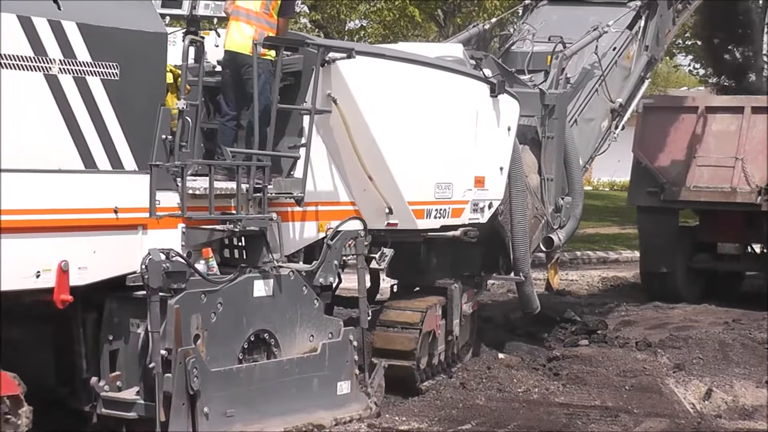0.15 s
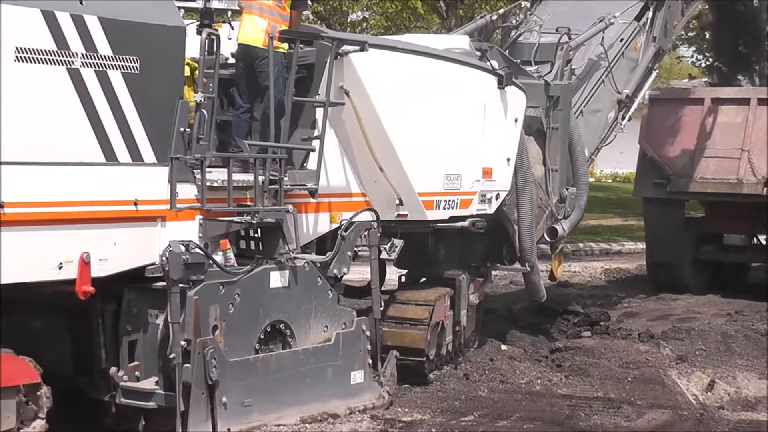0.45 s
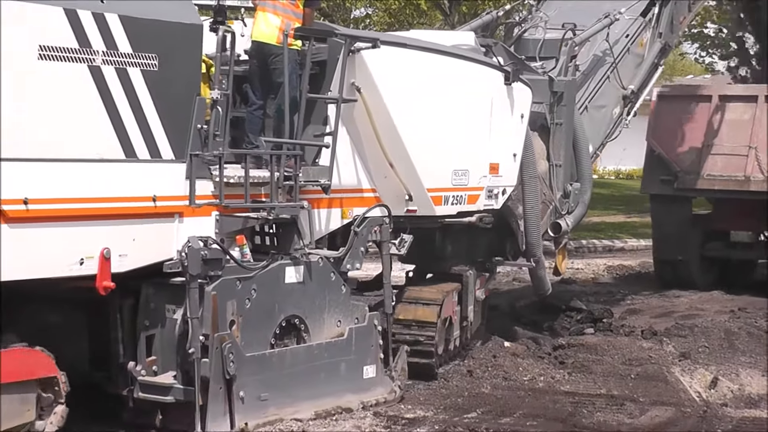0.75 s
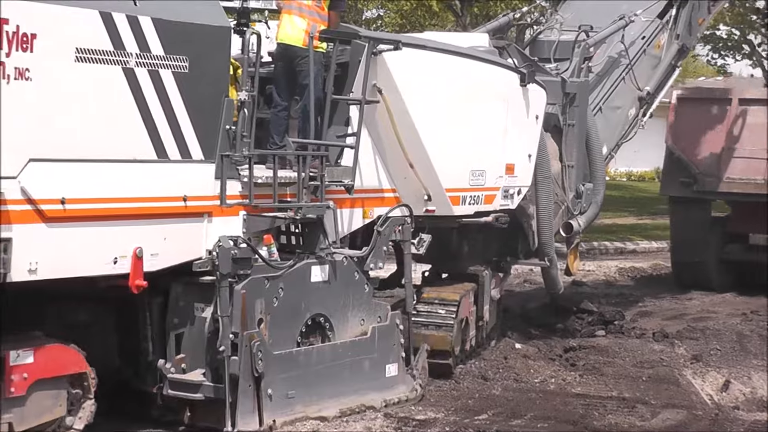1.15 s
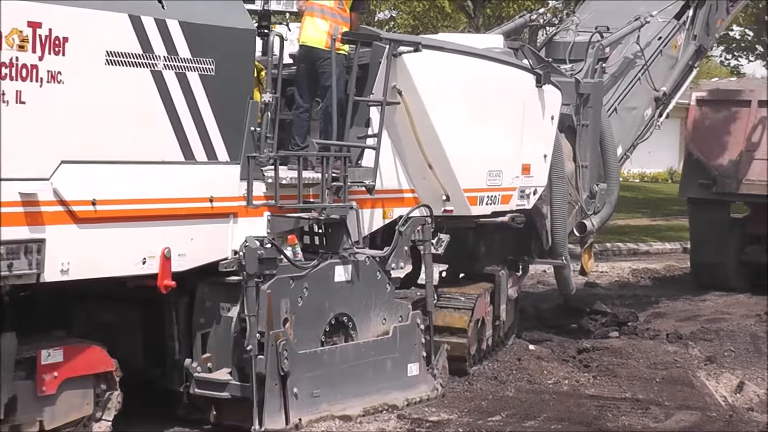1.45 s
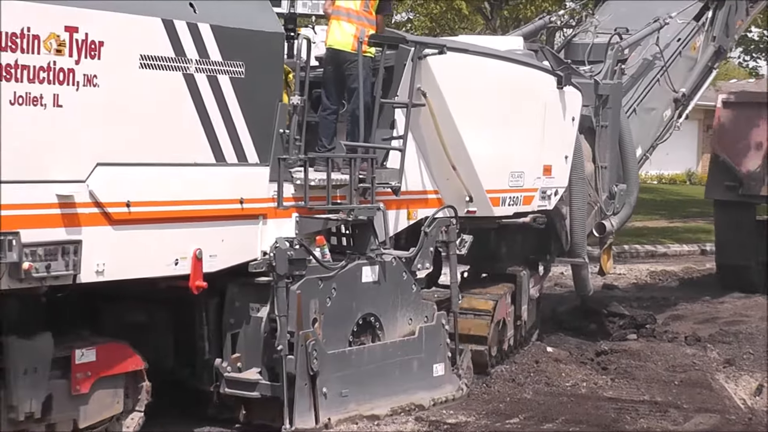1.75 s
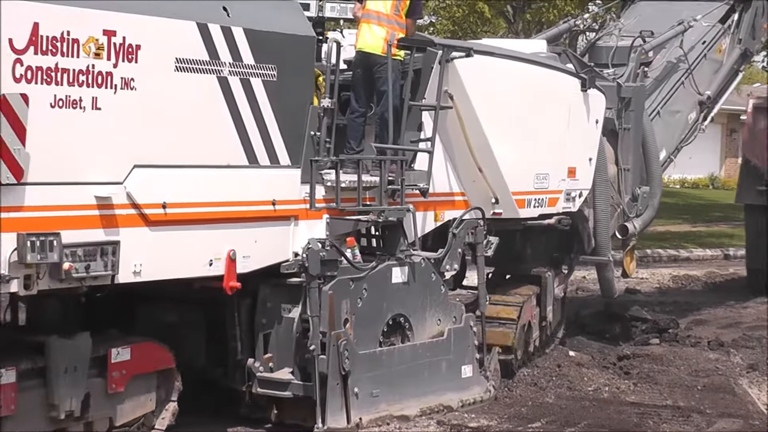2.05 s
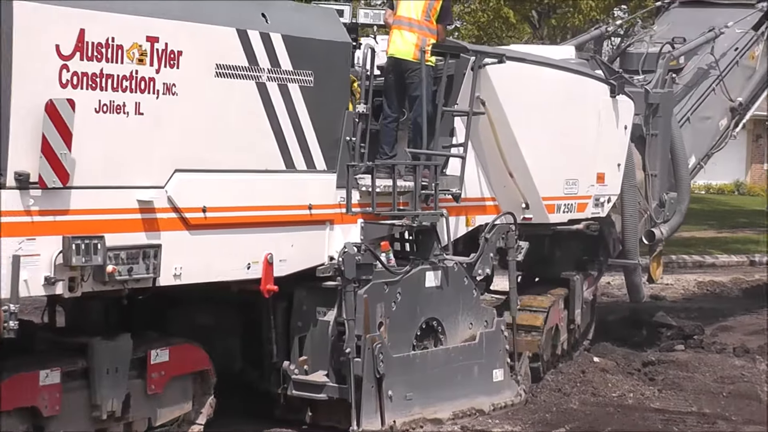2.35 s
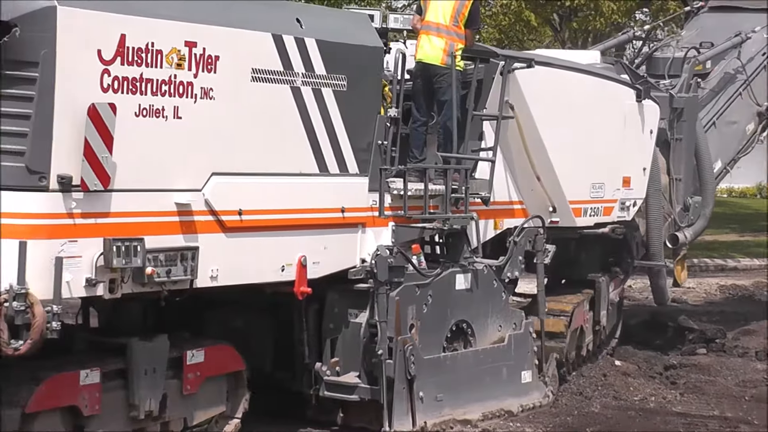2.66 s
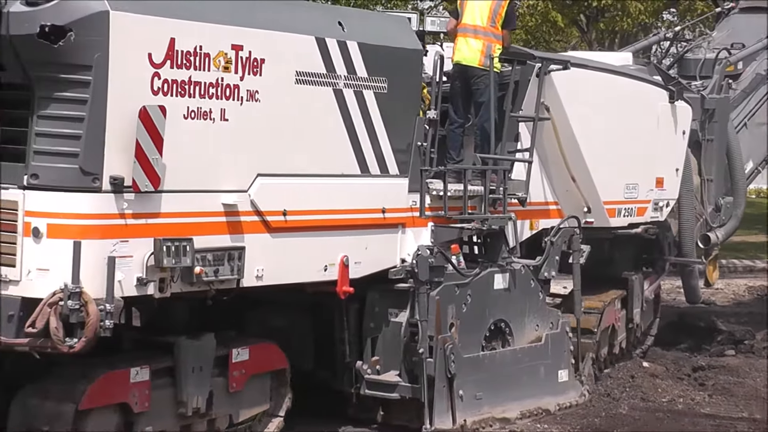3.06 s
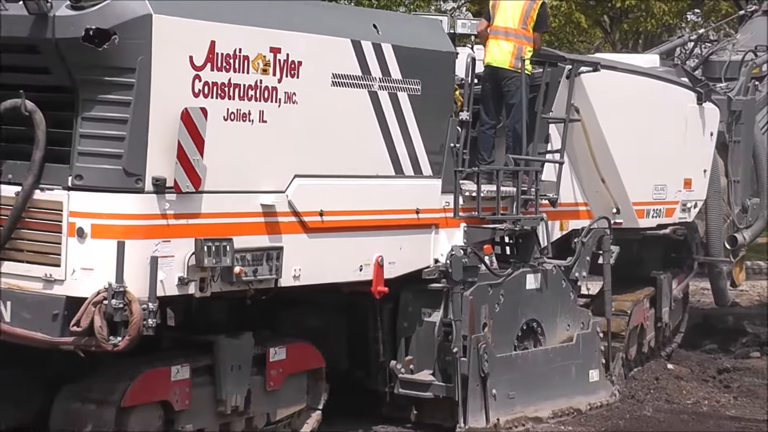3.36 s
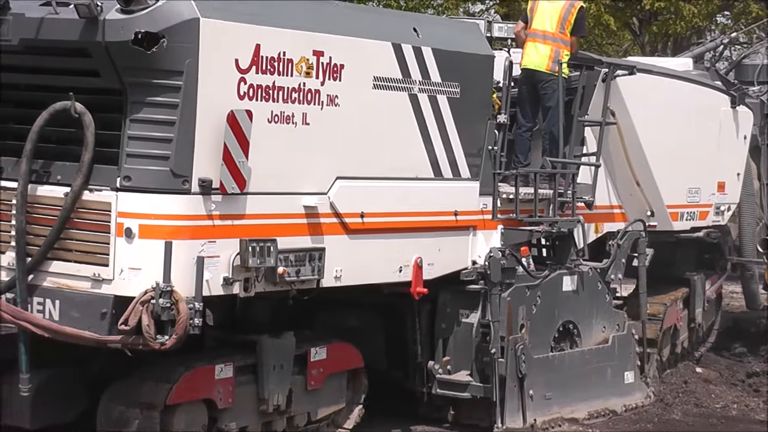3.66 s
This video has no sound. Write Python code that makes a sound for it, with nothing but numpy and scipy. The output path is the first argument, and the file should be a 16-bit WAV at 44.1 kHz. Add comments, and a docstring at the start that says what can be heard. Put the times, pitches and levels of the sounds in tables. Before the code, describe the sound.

Close outdoor stereo of a heavy milling machine: steady diesel and hydraulic roar with faint whine, constant piercing track squeaks and gritty crunches, brief metal scrapes, a small chink, then a dull knock and settling thuds.

```python
"""Work site, a stereo microphone close to a large road milling machine crawling on its tracks.
From the start: a roar of shaped noise, wavering sines for engine orders and pump whines, and fine grit.
Track pins squeal, pieced together from gliding sines, and track pads crunch in bursts of grains, to the end.
From 1.4 s four scrapes ring a link; at 2.5 s a loose part chinks twice. Near 3.4 s the roar drops and
a heavy knock rings low modes; at 3.7 s a heavy part settles with two thuds."""
import sys
import numpy as np
from scipy import signal
from scipy.fft import rfft, irfft
from scipy.io import wavfile

SR = 44100
rng = np.random.default_rng(int(sys.argv[2]) if len(sys.argv) > 2 else 0)


def waveform_to_disk(signal):
    """Save audio, clipped to [-1, 1], as 16-bit WAV at the path in sys.argv[1]."""
    frames = np.transpose(np.atleast_2d(signal))
    scaled = np.clip(frames, -1, 1) * 32767
    samples = np.round(scaled).astype(np.int16)
    wavfile.write(sys.argv[1], SR, samples)


N = 167139

# All levels are those ahead of record(), which lifts quiet sound by 0.9 dB.
# Roar of diesel, fans and hydraulics over time; only the swing about each column's mean is used:
# [start_s, middle_db, bass_db, upper_db, treble_db]
ROAR_SWING = [(0, -19.5, -15, -19, -38), (.31, -18.5, -17.5, -20, -37), (.61, -18.5, -16.5, -19.5, -36.5),
              (.8, -18, -15.5, -20.5, -37.5), (1.0, -17, -16, -19, -36), (1.2, -17, -13.5, -17, -36),
              (1.37, -15.5, -12.5, -18, -34.5), (1.5, -18.5, -15.5, -18.5, -34.5),
              (1.8, -17, -16, -18.5, -36), (1.95, -15.5, -15, -18.5, -33), (2.1, -18, -14.5, -20.5, -39),
              (2.3, -19, -18.5, -21, -36.5), (2.5, -19, -20.5, -21.5, -38.5),
              (2.72, -18.5, -14.5, -18, -34.5), (2.9, -18, -19, -20, -37.5), (3.15, -18, -15.5, -19, -34.5),
              (3.39, -18.5, -14, -19, -32.5), (3.415, -21, -19, -21.5, -32),
              (3.47, -21.5, -24, -25.5, -39.5), (3.68, -22, -25, -24.5, -37),
              (3.74, -20.5, -17, -18.5, -32.5), (3.79, -20.5, -19, -24, -39)]
# Spectrum of the roar, relative: [frequency_hz, density_db_per_hz]
ROAR_COLOUR = [(15, -59), (25, -38), (55, -21), (104, -2.5), (140, 2), (190, 0), (260, -2), (340, -5),
               (469, -2.5), (700, -4), (848, -10.5), (1080, -9.5), (1270, -12.5), (1850, -14.5),
               (2740, -19), (2980, -21.5), (3890, -24), (5240, -22.5), (6400, -31), (7500, -29.5),
               (8750, -36), (9730, -40.5), (13700, -52.5), (14600, -52.5), (15600, -65)]
ROAR_DB = -14.5  # rms of the direct roar
BASS_TOP_HZ, MIDDLE_TOP_HZ, UPPER_TOP_HZ = 320, 950, 6000
SHARED_SWING_DB, PATCHY_SWING_DB = .7, .5  # chance swings of all bands together and of each alone
FIRING_HZ, CHUFF_DEPTH, CHUFF_FROM_HZ = 134.8, 0.053, 900

# Engine lines, before they follow the roar: [multiple_of_firing, level_db rms]
ENGINE_ORDERS = [(1.0, -32.5), (2.0, -31.5), (4.06, -31.5), (5.18, -34)]
ORDER_WAVER_DB = 3.5
# First pump whine over time: [start_s, pitch_hz, level_db rms]
PUMP_WHINE = [(0, 2410, -38), (.45, 2408, -37), (.68, 2400, -45), (.85, 2398, -36), (1.15, 2395, -33),
              (1.55, 2387, -34), (2.05, 2398, -45), (2.25, 2408, -38), (2.65, 2413, -37), (3.79, 2408, -52)]
SECOND_WHINE_HZ, SECOND_WHINE_DB, SECOND_WAVER_DB = 2546, -42.5, 3.5

# Fine crackle under the tracks, before it follows the roar's upper band: [low_hz, high_hz, level_db rms]
GRIT_BANDS = [(150, 800, -28), (885, 3220, -34), (6470, 8800, -46)]
GRIT_PER_S, GRIT_FALL_S = 49, 0.0063

# Pieces of the track pins' squeals or of their octave partials, one a row;
# levels at a quarter and three quarters of the piece:
# [piece_start_s, piece_length_s, start_pitch_hz, end_pitch_hz, early_level_db rms, late_level_db rms]
SQUEAL_PIECES = [(0.031, 0.067, 9090.0, 8970.0, -40.0, -41.0), (0.097, 0.071, 8960.0, 8880.0, -41.0, -39.0),
                 (0.167, 0.071, 8910.0, 8950.0, -39.0, -39.0), (0.236, 0.081, 8930.0, 8930.0, -43.0, -47.0),
                 (0.352, 0.018, 5300, 5500, -19, -23), (0.37, 0.02, 5420, 5380, -29, -31),
                 (0.37, 0.067, 9130.0, 8910.0, -35.0, -39.0), (0.402, 0.06, 5350, 5380, -29, -33),
                 (0.436, 0.071, 8890.0, 8970.0, -37.0, -37.0), (0.452, 0.045, 8290.0, 8120.0, -37.0, -35.0),
                 (0.506, 0.071, 8950.0, 8910.0, -38.0, -43.0), (0.538, 0.054, 5220.0, 5270.0, -17.0, -22.0),
                 (0.58, 0.07, 5330, 5370, -25, -28), (0.576, 0.126, 10620.0, 10760.0, -55.0, -50.0),
                 (0.626, 0.061, 10960.0, 11040.0, -52.0, -51.0), (0.636, 0.038, 5400, 5390, -26, -21),
                 (0.68, 0.022, 5390, 5390, -16, -19), (0.685, 0.061, 11040.0, 11040.0, -54.0, -52.0),
                 (0.703, 0.075, 5380, 5390, -29, -27), (0.76, 0.015, 5280, 5200, -29, -31),
                 (0.778, 0.113, 9190.0, 9150.0, -42.0, -44.0), (0.879, 0.056, 5330, 5240, -21, -23),
                 (0.88, 0.101, 8910.0, 8960.0, -45.0, -41.0), (0.9, 0.041, 10540.0, 10540.0, -54.0, -47.0),
                 (0.915, 0.047, 5150, 5140, -22, -18), (0.925, 0.066, 10270.0, 10350.0, -46.0, -48.0),
                 (0.935, 0.091, 10370.0, 10520.0, -49.0, -47.0), (0.964, 0.02, 5170, 5260, -22, -23),
                 (0.98, 0.096, 8990.0, 8900.0, -45.0, -42.0), (1.022, 0.042, 5230, 5300, -28, -27),
                 (1.025, 0.111, 10540.0, 10810.0, -53.0, -53.0), (1.064, 0.044, 5330, 5380, -24, -25),
                 (1.077, 0.034, 8440.0, 8370.0, -39.0, -44.0), (1.112, 0.055, 5400, 5410, -25, -28),
                 (1.15, 0.03, 8000.0, 7980.0, -43.0, -43.0), (1.164, 0.091, 9220.0, 9170.0, -45.0, -47.0),
                 (1.185, 0.05, 5370, 5350, -32, -34), (1.254, 0.066, 8900.0, 8810.0, -41.0, -44.0),
                 (1.294, 0.036, 9130.0, 9130.0, -48.0, -46.0), (1.335, 0.06, 8810.0, 8810.0, -43.0, -46.0),
                 (1.344, 0.086, 10190.0, 10190.0, -41.0, -40.0),
                 (1.399, 0.046, 10090.0, 10110.0, -39.0, -43.0),
                 (1.404, 0.036, 9280.0, 9380.0, -43.0, -40.0), (1.405, 0.048, 4830, 4870, -18, -19),
                 (1.429, 0.091, 10200.0, 10230.0, -47.0, -50.0),
                 (1.491, 0.029, 8650.0, 8550.0, -39.0, -43.0),
                 (1.519, 0.091, 10260.0, 10420.0, -49.0, -49.0), (1.556, 0.04, 5260, 5250, -26, -24),
                 (1.598, 0.05, 5260, 5250, -29, -32), (1.575, 0.034, 7740.0, 7740.0, -39.0, -42.0),
                 (1.706, 0.025, 5300, 5380, -31, -30), (1.728, 0.02, 5120, 5130, -28, -23),
                 (1.745, 0.026, 5130, 5190, -18, -14), (1.772, 0.02, 5230, 5260, -21, -24),
                 (1.728, 0.07, 10280, 10350, -54, -53), (1.74, 0.105, 8870, 8860, -45, -40),
                 (1.81, 0.039, 10060.0, 10030.0, -45.0, -43.0), (1.814, 0.016, 4950, 4800, -28, -26),
                 (1.828, 0.022, 4780, 4930, -22, -26), (1.919, 0.035, 5300.0, 5290.0, -26.0, -32.0),
                 (1.92, 0.07, 9150.0, 9150.0, -48.0, -49.0), (1.958, 0.041, 5290.0, 5270.0, -34.0, -33.0),
                 (2.013, 0.07, 5250.0, 5260.0, -30.0, -36.0), (2.171, 0.062, 8850.0, 8850.0, -44.0, -46.0),
                 (2.232, 0.061, 8870.0, 8860.0, -45.0, -44.0), (2.287, 0.036, 9120.0, 9130.0, -46.0, -46.0),
                 (2.298, 0.065, 3410.0, 3430.0, -36.0, -34.0), (2.312, 0.041, 8850.0, 8870.0, -44.0, -45.0),
                 (2.332, 0.046, 10760, 10640, -53, -54), (2.45, 0.1, 10080, 10160, -54, -54),
                 (2.33, 0.05, 5350, 5320, -28, -27), (2.39, 0.045, 5350, 5300, -33, -31),
                 (2.347, 0.056, 8940.0, 8920.0, -44.0, -43.0), (2.362, 0.051, 9040.0, 9050.0, -43.0, -45.0),
                 (2.366, 0.069, 3430.0, 3470.0, -38.0, -37.0), (2.412, 0.02, 5180, 5100, -26, -24),
                 (2.43, 0.05, 5220, 5200, -30, -30), (2.44, 0.04, 5040, 5030, -30, -29),
                 (2.478, 0.042, 5030, 5070, -23, -23), (2.516, 0.041, 5020.0, 5120.0, -30.0, -29.0),
                 (2.55, 0.06, 9150.0, 9100.0, -48.0, -50.0), (2.578, 0.029, 5250, 5240, -23, -24),
                 (2.6, 0.03, 5480, 5620, -31, -31), (2.61, 0.087, 8850.0, 8940.0, -45.0, -46.0),
                 (2.616, 0.041, 10490.0, 10460.0, -54.0, -54.0), (2.619, 0.045, 5200, 5250, -32, -34),
                 (2.632, 0.022, 5350, 5600, -32, -30), (2.675, 0.06, 5170, 5140, -32, -30),
                 (2.69, 0.037, 7800.0, 7710.0, -42.0, -40.0),
                 (2.703, 0.044, 10220.0, 10310.0, -52.0, -54.0),
                 (2.711, 0.071, 8940.0, 8890.0, -44.0, -43.0),
                 (2.754, 0.093, 10220.0, 10190.0, -52.0, -49.0),
                 (2.781, 0.071, 8910.0, 8890.0, -44.0, -45.0), (2.765, 0.025, 5200, 5350, -34, -31),
                 (2.801, 0.06, 5050, 5100, -26, -28), (2.82, 0.03, 5330, 5350, -31, -32),
                 (2.837, 0.04, 5210.0, 5170.0, -27.0, -31.0), (2.855, 0.067, 8870.0, 8970.0, -40.0, -45.0),
                 (2.865, 0.04, 5230, 5180, -30, -30), (2.895, 0.04, 5280, 5330, -29, -28),
                 (2.913, 0.078, 10240.0, 10230.0, -53.0, -47.0),
                 (2.92, 0.086, 8970.0, 8930.0, -43.0, -42.0), (2.935, 0.035, 5200, 5200, -31, -25),
                 (2.957, 0.054, 5040.0, 5030.0, -26.0, -31.0), (2.966, 0.055, 8870.0, 8910.0, -41.0, -43.0),
                 (2.99, 0.045, 5220, 5270, -29, -27), (3.005, 0.02, 5420, 5480, -32, -31),
                 (2.99, 0.076, 10200.0, 10260.0, -53.0, -52.0),
                 (3.023, 0.078, 8880.0, 8940.0, -39.0, -41.0), (3.04, 0.035, 5450, 5550, -32, -30),
                 (3.08, 0.022, 5500, 5490, -26, -28), (3.108, 0.035, 5490, 5480, -28, -33),
                 (3.045, 0.091, 11050.0, 10930.0, -56.0, -47.0),
                 (3.115, 0.071, 8570.0, 8400.0, -40.0, -42.0),
                 (3.135, 0.091, 10940.0, 10860.0, -48.0, -51.0), (3.143, 0.098, 5490.0, 5450.0, -31, -30),
                 (3.143, 0.03, 5320, 5250, -26, -29), (3.195, 0.022, 5230, 5280, -30, -29),
                 (3.226, 0.035, 5320, 5270, -27, -27), (3.185, 0.076, 8390.0, 8400.0, -43.0, -45.0),
                 (3.2, 0.07, 5050.0, 5050.0, -35.0, -32.0), (3.234, 0.032, 10340.0, 10340.0, -49.0, -52.0),
                 (3.249, 0.045, 5870, 5820, -35, -35), (3.262, 0.03, 5050, 5020, -30, -27),
                 (3.292, 0.03, 5110, 5130, -27, -28), (3.325, 0.078, 5840, 5790, -31, -30.0),
                 (3.33, 0.06, 5050.0, 4950.0, -32.0, -33.0), (3.334, 0.04, 5380, 5350, -33, -31),
                 (3.378, 0.055, 5400, 5330, -23, -28), (3.355, 0.04, 10700.0, 10740.0, -51.0, -48.0),
                 (3.369, 0.041, 10240.0, 10160.0, -47.0, -46.0),
                 (3.394, 0.046, 10640.0, 10480.0, -49.0, -47.0), (3.43, 0.075, 5310, 5230, -28, -29),
                 (3.484, 0.041, 5090.0, 5160.0, -32.0, -34.0), (3.533, 0.042, 5250.0, 5160.0, -36.0, -37.0),
                 (3.58, 0.025, 5400, 5420, -34, -36), (3.592, 0.045, 5100, 5130, -31, -29),
                 (3.62, 0.07, 5400, 5400, -36, -36), (3.64, 0.035, 5130, 5170, -35, -34),
                 (3.64, 0.06, 5880.0, 5830.0, -41.0, -39.0), (3.65, 0.05, 9000.0, 9000.0, -48.0, -49.0),
                 (3.679, 0.045, 5230, 5270, -22, -25), (3.689, 0.096, 5450, 5530, -32, -34),
                 (3.73, 0.02, 5280, 5300, -28, -28), (3.73, 0.055, 5820.0, 5850.0, -41.0, -41.0),
                 (3.743, 0.051, 10740.0, 10800.0, -53.0, -50.0),
                 (3.754, 0.04, 5300.0, 5290.0, -29.0, -28.0), (3.754, 0.04, 5370.0, 5410.0, -28.0, -27.0)]
SQUEAL_EDGE_S, SQUEAL_FLUTTER_DB, SQUEAL_JITTER_HZ, SQUEAL_SKIRT_DB = .011, 2.0, 13, -9.5
# Where squeal pieces sit in the stereo image: [pitch_hz, left_over_right_db]
SQUEAL_PAN = [(3400, 3), (5300, -1.5), (8800, 3), (10500, 5.5)]

# Crunches under the track pads, levels before CRUNCH_DB is added:
# [start_s, middle_level_db, top_re_middle_db, bottom_re_middle_db]
CRUNCHES = [(0.0697, -21, -27.5, -10), (0.3097, -14, -32, -3.5), (0.6454, -24, -14, -11.5),
            (1.3079, -24.5, -15, -21.5), (1.4935, -19, -22, -14), (1.5894, -29.5, -20, -10),
            (2.0108, -12.5, -31, -2), (2.0642, -14.5, -32, -2), (2.1385, -20, -24, -9),
            (2.2244, -17.5, -27, 1), (2.2787, -24.5, -20, -10), (2.4922, -20, -20, -4.5),
            (2.7152, -33, -22, -16), (2.7844, -28, -20, -15), (3.0395, -17, -16.5, -13),
            (3.1078, -9.5, -25, -2.5), (3.1507, -20, -21, -8.5), (3.1921, -19, -26.5, -9),
            (3.2276, -20, -21, -8.5), (3.3744, -20, -14, -7), (3.4181, -19, -17, -12),
            (3.4396, -22, -28, -11), (3.4615, -20.5, -23.5, -3), (3.5094, -23, -22, -10),
            (3.6042, -20, -21.5, -11.5), (3.6227, -20.5, -20, -2), (3.6694, -24, -15.5, -12),
            (3.709, -22.5, -17, -10), (3.7269, -19, -24, -10)]
# Resonances of the crunch's middle band, relative: [pitch_hz, level_db, t60_s]
CRUNCH_MODES = [(6150, 7, 0.0041), (7300, 1.5, 0.013), (7565, 0, 0.011), (8380, 2.5, 0.0049)]
CRUNCH_RISE_S, CRUNCH_FALL_S, CRUNCH_DB, CRUNCH_GRAINS_PER_S = 0.0013, 0.0088, -7, 3500

# Scrapes of the track links: [start_s, length_s, level_db of the ring]
SCRAPES = [(1.396, 0.047, -32), (1.811, 0.033, -27.5), (2.484, 0.02, -31), (3.363, 0.023, -27)]
# Modes of a scraped link, relative: [pitch_hz, level_db, t60_s]
LINK_MODES = [(4400, -4.5, 0.033), (4920, -11, 0.066), (6340, 1, 0.028), (6820, -8.5, 0.0196),
              (7340, 2.5, 0.028), (7700, -1, 0.0254), (8750, -5.5, 0.0206), (9300, -9, 0.0312),
              (10205, -3, 0.0305), (11570, -19, .02)]
SLIPS_PER_S, SCRAPE_LOW_DB = 470, 7  # the second is extra weight on modes between 4 and 5 kHz
SCRAPE_HISS_DB, SCRAPE_TOP_HZ = -14, 10500  # hiss relative to the ring

# A loose part chinks twice: [start_s, blow_db]
CHINKS = [(2.489, -23.5), (2.496, -19.5)]
# Its modes, relative to the blow: [pitch_hz, level_db, t60_s]
CHINK_MODES = [(3800, 3, .03), (3960, -5, .025), (4400, -5, .02)]
# Blows of the heavy knock, a few ms apart: [start_s, blow_db]
KNOCKS = [(3.4250, -3), (3.4284, -5), (3.4318, -4)]
# Its modes, relative to the blow: [pitch_hz, level_db, t60_s]
KNOCK_MODES = [(165, -11, .06), (470, -9, .02), (590, -3, .026), (830, -8, .012)]
# A heavy part settles: [start_s, blow_db]
THUDS = [(3.721, -8), (3.742, -9)]
# Its modes, relative to the blow: [pitch_hz, level_db, t60_s]
THUD_MODES = [(105, -2, .1), (165, -5, .07)]

# Width of the roar, before DIFFUSE_DB is added: [frequency_hz, side_re_mid_db]
SIDE_LEVEL = [(60, -12.5), (110, -11), (200, -24), (380, -20), (700, -10), (1290, -9), (2380, -10),
              (4400, -35.5), (8120, -3), (15000, -24)]
DIFFUSE_DB = -4.5  # share of the side that is diffuse
# Stereo balance at the microphone: [frequency_hz, left_over_right_db]
STEREO_LEAN = [(60, -1), (110, 1), (200, 0), (380, -1.5), (700, -1.0), (1290, 1.0), (2380, 2.0),
               (4400, -0.5), (8120, 1.5), (15000, -1)]
# Phase between the microphone ports: [frequency_hz, left_lead_rad]
STEREO_LEAD = [(0, 0), (260, -0.38), (780, 0.274), (3190, -0.41), (6370, 0.41), (8870, -0.1), (15200, 0.0)]
# Echoes of the metal off ground and bodywork: [delay_s, level_db re direct]
ECHOES = [(0.01, -15.5), (.023, -25), (.041, -40)]
CUTOFF_HZ = 15650  # top of the recorder


def from_db(db):
    """Decibels to gain."""
    return 10 ** (np.asarray(db) / 20)


def rms_one(x):
    """Scale to rms 1."""
    return x / np.sqrt(np.mean(x ** 2) + 1e-20)


def in_time(rows):
    """Columns of a curve, interpolated at every sample."""
    s, *columns = np.transpose(rows)
    return [np.interp(np.arange(N) / SR, s, column) for column in columns]


def at_hz(points, hz):
    """Table value on a log-frequency axis."""
    f, value = np.transpose(points)
    return np.interp(np.log(np.maximum(hz, 1)), np.log(np.maximum(f, 1)), value)


def drift(rate_hz):
    """Slow chance of spread 1: low-passed noise made at a twentieth of the sample rate."""
    r = np.exp(-40 * np.pi * rate_hz / SR)
    noise = rng.standard_normal(N // 20 + 4002)
    slow = signal.lfilter([1], [1, -2 * r, r * r], noise)[4000:]  # drop the filter's settling
    return np.interp(np.arange(N) / 20, np.arange(len(slow)), rms_one(slow))


def ring(clicks, hz, t60):
    """A unit click sets a decaying sine of height 1 ringing."""
    r = from_db(-60 / (max(t60, .002) * SR))
    w = 2 * np.pi * hz / SR
    return signal.lfilter([0, np.sin(w)], [1, -2 * r * np.cos(w), r * r], clicks + 1e-18)


def tone(hz):
    """Sine of rms 1 on a moving pitch."""
    phase = 2 * np.pi * np.cumsum(hz * np.ones(N)) / SR
    return np.sqrt(2) * np.sin(phase + rng.uniform(0, 2 * np.pi))


def band(x, low_hz, high_hz, order):
    """Keep one frequency band."""
    return signal.sosfilt(signal.butter(order, [low_hz, high_hz], "band", fs=SR, output="sos"), x)


def strike(blows, modes, low_hz):
    """Every blow rings all modes of a body, each 1 dB or so off its level; rumble under low_hz is cut."""
    s, blow_db = np.transpose(blows)
    spread_db = rng.normal(0, 1.0, (len(s), len(modes)))
    out = 0
    for k, (hz, mode_db, t60) in enumerate(modes):
        clicks = np.zeros(N)
        at = np.minimum(s * SR, N - 1).astype(int)
        np.add.at(clicks, at, from_db(blow_db + mode_db + spread_db[:, k]))
        out = out + ring(clicks, hz, t60)
    return signal.sosfilt(signal.butter(2, low_hz, "high", fs=SR, output="sos"), out)


def roar():
    """Patchy coloured noise whose upper bands chuff at the firing rate; returns direct and diffuse parts."""
    middle_db, bass_db, upper_db, treble_db = [db - db.mean() for db in in_time(ROAR_SWING)]
    swings_db = [bass_db, middle_db, upper_db, treble_db]
    hz = np.fft.rfftfreq(N, 1 / SR)
    side_db = at_hz(SIDE_LEVEL, hz) + DIFFUSE_DB
    colour = from_db(at_hz(ROAR_COLOUR, hz)) * from_db([np.zeros_like(hz), side_db])
    spectrum = rfft(rng.standard_normal((2, N))) * colour
    firing_hz = FIRING_HZ * (1 + 0.0055 * drift(1.8))
    chuff = 1 + CHUFF_DEPTH * np.cos(np.pi * np.cumsum(firing_hz) / SR) ** 2
    shared_db = SHARED_SWING_DB * drift(14)
    out = 0
    for centre in 30 * 2 ** np.arange(0, 9.6, .5):  # overlapping bands half an octave apart
        octaves_off = np.log2(np.maximum(hz, 1) / centre)
        window = np.cos(np.pi * np.clip(octaves_off, -.5, .5)) ** 2
        swing_db = swings_db[np.searchsorted([BASS_TOP_HZ, MIDDLE_TOP_HZ, UPPER_TOP_HZ], centre)]
        gain = from_db(swing_db + shared_db + PATCHY_SWING_DB * drift(21.6))
        if centre > CHUFF_FROM_HZ:
            gain = gain * chuff
        out = out + irfft(spectrum * window, N) * gain
    return out / np.std(out[0]) * from_db(ROAR_DB)


def engine_orders():
    """Sines at multiples of one wandering firing rate, each wavering in level."""
    firing_hz = FIRING_HZ * (1 + 0.01067 * drift(2.017))
    return sum(from_db(db + ORDER_WAVER_DB * drift(4.6)) * tone(multiple * firing_hz)
               for multiple, db in ENGINE_ORDERS)


def first_whine():
    """The pump's faint whine: a sine along a pitch curve, unsteady in pitch and level."""
    hz, db = in_time(PUMP_WHINE)
    return from_db(db + 2.0 * drift(12)) * tone(hz + 5 * drift(10))


def second_whine():
    """A higher pump whine: a sine wandering about one pitch and level."""
    gain = from_db(SECOND_WHINE_DB + SECOND_WAVER_DB * drift(3.5))
    return gain * tone(SECOND_WHINE_HZ + 12 * drift(14.3))


def engine_lines():
    """Orders and second whine swell with the middle of the roar; the first whine keeps its own curve."""
    middle_db = in_time(ROAR_SWING)[0]
    swell = from_db(middle_db - middle_db.mean())
    return (engine_orders() + second_whine()) * swell + first_whine()


def grit():
    """Small crackles at random moments, each a decaying puff of noise, following the roar's upper band."""
    size_db = 3.0 * np.minimum(rng.exponential(1, N), 2)
    born = (rng.random(N) < GRIT_PER_S / SR) * from_db(size_db)
    decay = np.exp(-1 / (GRIT_FALL_S * SR))
    puffs = signal.lfilter([1], [1, -decay], born) * rng.standard_normal(N)
    upper_db = in_time(ROAR_SWING)[2]
    crackle = sum(from_db(db) * rms_one(band(puffs, low, high, 5)) for low, high, db in GRIT_BANDS)
    return from_db(upper_db - upper_db.mean()) * crackle


def squeals():
    """Each row is a piece of a pin squeal or its octave partial: a gliding sine that flutters, with a skirt."""
    out = np.zeros((2, N + SR))
    flutter, jitter, skirt = drift(52), drift(40), drift(170)
    for k, (s, length, start_hz, end_hz, early_db, late_db) in enumerate(SQUEAL_PIECES):
        t = np.arange(int((length + SQUEAL_EDGE_S) * SR)) / SR
        progress = t / t[-1]
        at = (np.arange(len(t)) + k * 7919) % N  # another stretch of chance for each piece
        edge = np.sin(np.pi / 2 * np.clip(np.minimum(t, t[-1] - t) / SQUEAL_EDGE_S, 0, 1))
        hz = start_hz + (end_hz - start_hz) * progress + SQUEAL_JITTER_HZ * jitter[at]
        db = np.interp(progress, [.25, .75], [early_db, late_db]) + SQUEAL_FLUTTER_DB * flutter[at]
        sine = np.sqrt(2) * np.sin(2 * np.pi * np.cumsum(hz) / SR)
        wave = sine * (1 + from_db(SQUEAL_SKIRT_DB) * skirt[at])  # fast chance makes a noisy skirt
        pan = from_db(at_hz(SQUEAL_PAN, start_hz) * np.array([[.5], [-.5]]))
        i = max(int((s - SQUEAL_EDGE_S / 2) * SR), 0)
        out[:, i:i + len(t)] += wave * edge * from_db(db) * pan
    return out[:, :N]


def crunch_middle(x):
    """Grains ring the crunch modes, with alternating sign, inside the middle band."""
    modes = sum(from_db(db) * ring(x, hz, t60) * (-1) ** k
                for k, (hz, db, t60) in enumerate(CRUNCH_MODES))
    return band(modes, 5500, 9200, 3)


def crunch_top(x):
    """The bright part of the grains."""
    return band(x, 9200, 13500, 3)


def crunch_bottom(x):
    """The low part of the grains."""
    return band(x, 3370, 5000, 3)


def crunches():
    """Short bursts of random grains under the pads: ringing middle, top and bottom weighted per burst."""
    t = np.arange(N) / SR
    grains = rms_one((rng.random(N) < CRUNCH_GRAINS_PER_S / SR) * rng.standard_normal(N))
    bursts = np.zeros((3, N))
    for s, db, top_db, bottom_db in CRUNCHES:
        i = int(s * SR)
        age = t[i:i + SR // 10] - s
        shape = np.clip(age / CRUNCH_RISE_S, 0, 1) * np.exp(-age / CRUNCH_FALL_S)
        part_db = np.array([[0], [top_db], [bottom_db]])
        bursts[:, i:i + len(age)] += shape * from_db(db + CRUNCH_DB + part_db)
    out = 0
    for part, burst in zip([crunch_middle, crunch_top, crunch_bottom], bursts):
        out = out + part(grains * burst + 1e-18) / np.std(part(grains))
    return out


def scrapes():
    """Short runs of uneven slips ring the link, with extra weight on low modes and a grinding hiss."""
    t = np.arange(N) / SR
    stroke = sum(from_db(db) * (t > s) * (t < s + length) for s, length, db in SCRAPES)
    slips = rms_one((rng.random(N) < SLIPS_PER_S / SR) * rng.standard_normal(N))
    body = rms_one(sum(from_db(db + SCRAPE_LOW_DB * (4000 < hz < 5000)) * ring(slips, hz, t60)
                       for hz, db, t60 in LINK_MODES))
    hiss = rms_one(band(rng.standard_normal(N) + slips, 6500, 12000, 2))
    fade = np.exp(-1 / (0.00285 * SR))  # softens both ends of a stroke
    pressure = signal.lfilter([1 - fade], [1, -fade], stroke)
    rub = pressure * (body + from_db(SCRAPE_HISS_DB) * hiss)
    return signal.sosfilt(signal.butter(3, SCRAPE_TOP_HZ, fs=SR, output="sos"), rub)


def chinks():
    """Two blows ring the short high modes of a loose part."""
    return strike(CHINKS, CHINK_MODES, 100)


def knocks():
    """Closely spaced blows ring the low, quickly damped modes of something heavy."""
    return strike(KNOCKS, KNOCK_MODES, 100)


def thuds():
    """Two blows ring the deep modes of a heavy part as it settles."""
    return strike(THUDS, THUD_MODES, 75)


def scene():
    """All sources at the two microphone ports; the metal sounds echo with left and right swapped."""
    direct, diffuse = roar()
    centre = direct + engine_lines() + grit() + knocks() + thuds()
    hz = np.fft.rfftfreq(N, 1 / SR)
    tilt = from_db(at_hz(STEREO_LEAN, hz) / 2) * np.exp(.5j * at_hz(STEREO_LEAD, hz))
    placed = irfft(rfft(centre) * np.array([tilt, 1 / tilt]), N)
    wide = placed + diffuse * [[1], [-1]]  # opposite sign in left and right
    metal = squeals() + crunches() + scrapes() + chinks()
    echo = 0
    for delay_s, db in ECHOES:
        late = np.pad(metal, ((0, 0), (int(delay_s * SR), 0)))
        echo = echo + from_db(db) * late[::-1, :N]
    return wide + metal + echo


def record(dry):
    """The recorder rounds the peaks and cuts the top steeply."""
    rounded = 1.678 * np.tanh(dry / 1.517)
    return signal.sosfilt(signal.ellip(12, .5, 80, CUTOFF_HZ, fs=SR, output="sos"), rounded)


dry = scene()
out = record(dry)
waveform_to_disk(out)
```